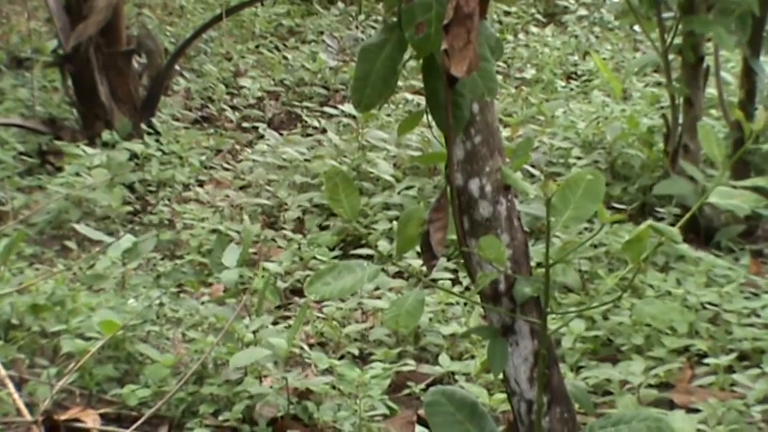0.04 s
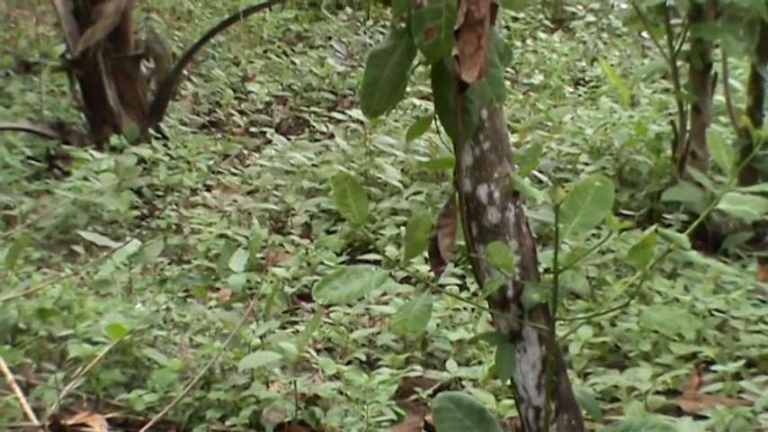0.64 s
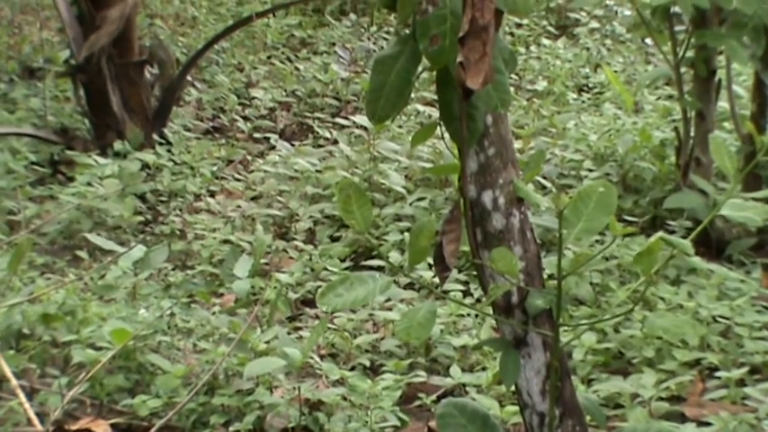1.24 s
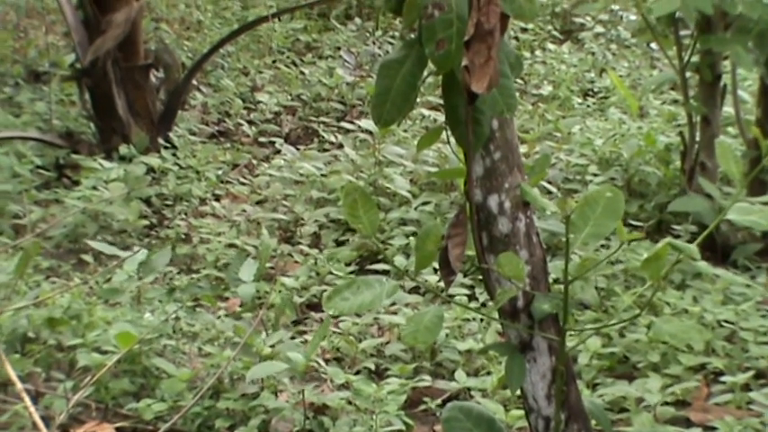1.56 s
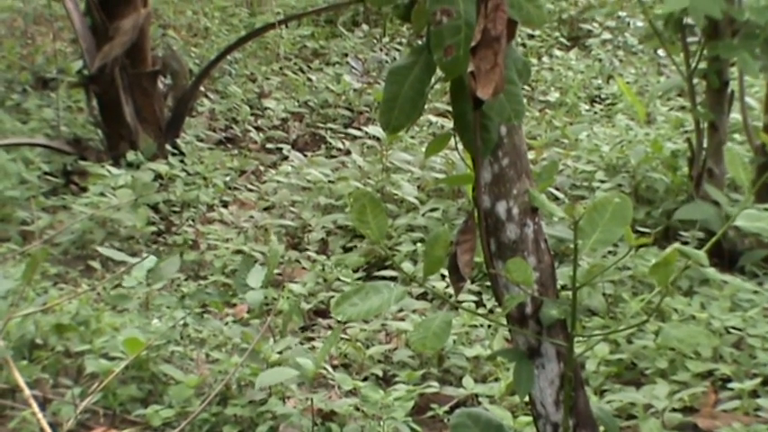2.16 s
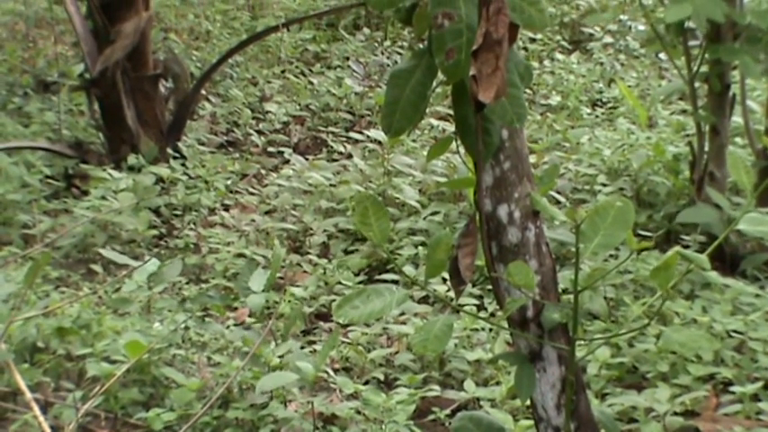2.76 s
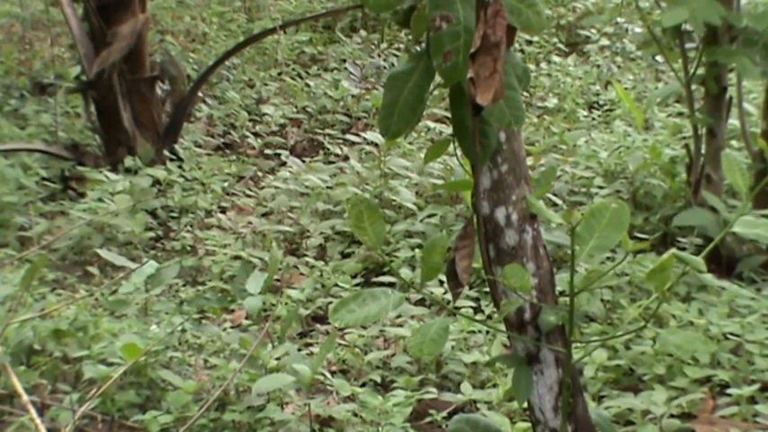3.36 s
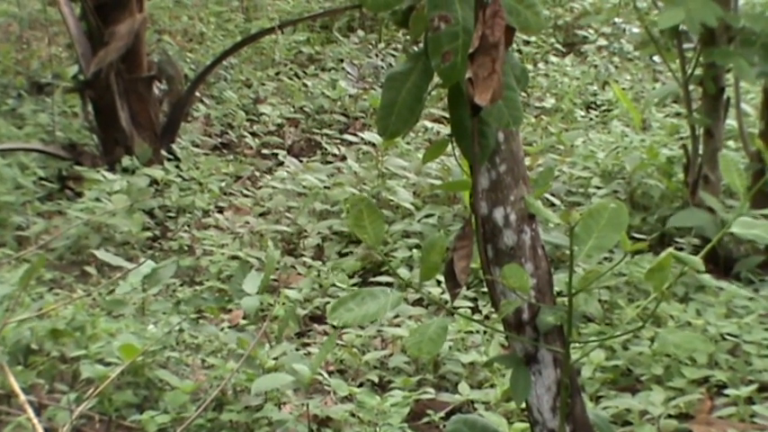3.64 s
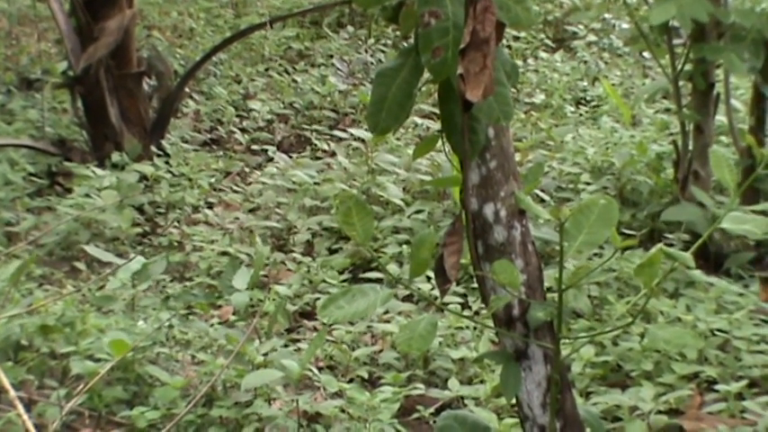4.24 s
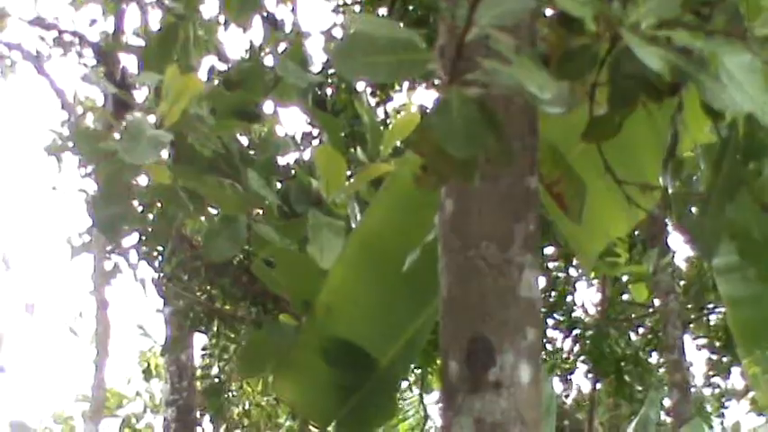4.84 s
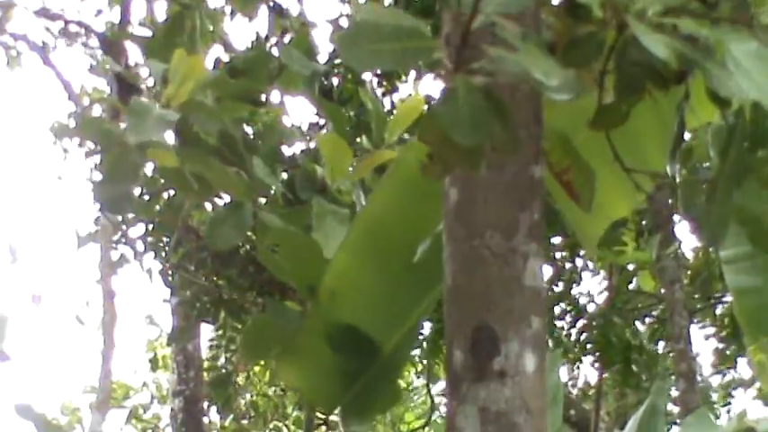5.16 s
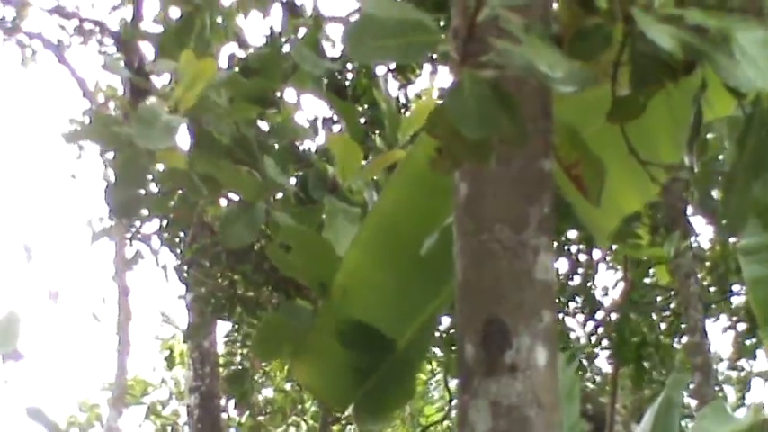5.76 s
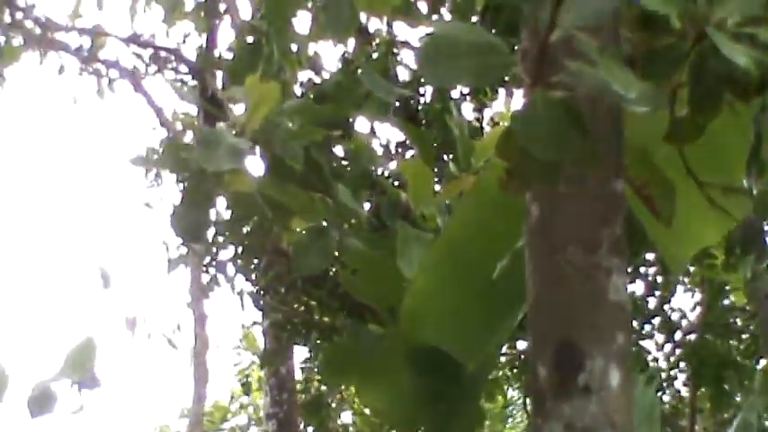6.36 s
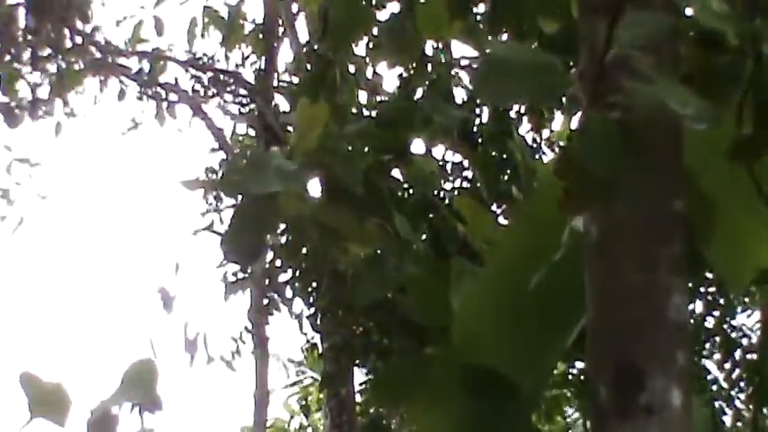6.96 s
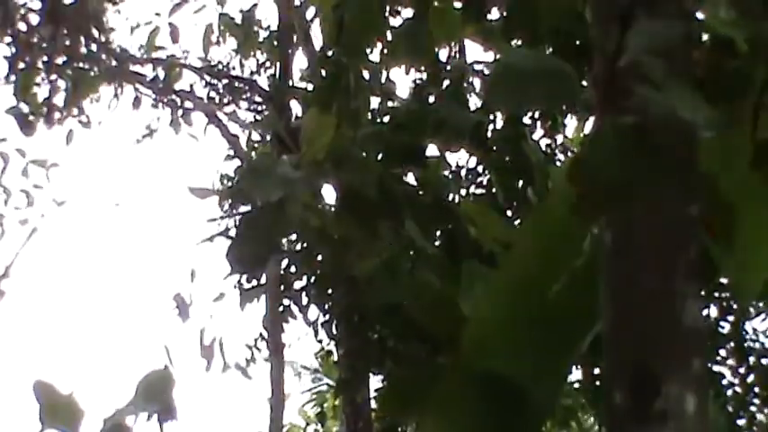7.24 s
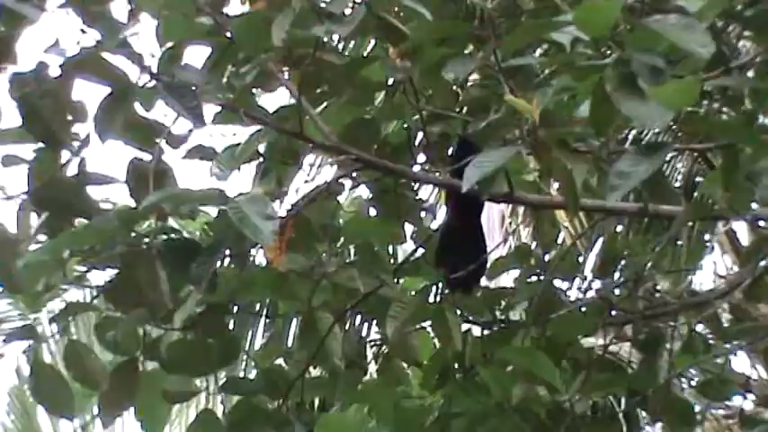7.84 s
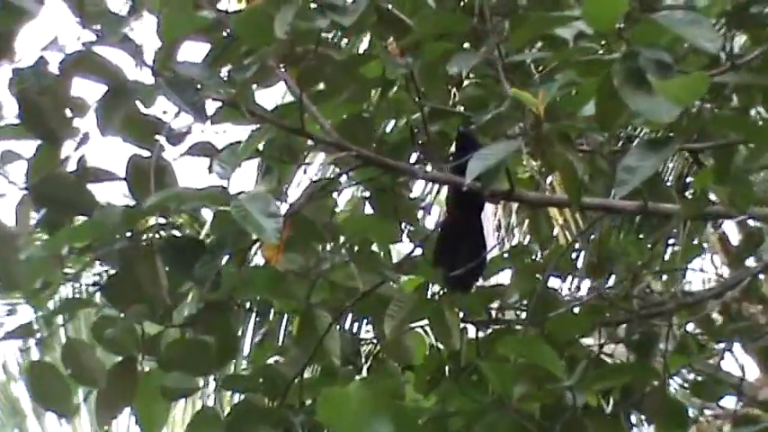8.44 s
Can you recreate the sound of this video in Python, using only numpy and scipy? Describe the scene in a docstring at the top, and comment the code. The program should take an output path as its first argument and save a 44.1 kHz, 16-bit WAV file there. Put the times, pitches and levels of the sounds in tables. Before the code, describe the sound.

Soft forest air, scattered drips and thin, high cricket chirps surround a bird hooting eight low notes, each dipping in pitch. The microphone moves under the trees with a quick fade, where more water patters on the leaves and eight louder hoots follow. Distant animals call faintly now and then. At a last spot the hoots are gone, leaving drips, a chirping cricket and a steady high trill.

```python
"""Wet forest from three microphone spots, joined by short fades; far air murmurs and water drips on leaves.
At the first spot bush crickets chirp high up with their wings, and a coucal hoots eight low notes,
each thrown back by ground and trunks; faint animal calls begin in the distance.
From 4.4 s, under the trees, the drips fall thicker and the coucal hoots a second, louder run of eight.
From 7.9 s, at the last spot, one cricket chirps and another trills without a break."""
import sys
import numpy as np
from scipy import signal
from scipy.io import wavfile
from scipy.ndimage import uniform_filter1d

SR = 44100
rng = np.random.default_rng(int(sys.argv[2]) if len(sys.argv) > 2 else 0)


def store_wav(level_fs):
    """Save 16-bit WAV to argv[1]."""
    pcm = np.round(np.clip(np.atleast_2d(level_fs), -1, 1) * 32767)
    wavfile.write(sys.argv[1], SR, pcm.T.astype(np.int16))


N = 383229
TIME = np.arange(N) / SR
SPOT_CHANGES_S = (4.41, 7.854)

# fades between the microphone spots: t/s, gain
SPOT_FADES = [(0, 1), (4.35, 1), (4.395, 0), (4.425, 0), (4.465, 1), (7.82, 1), (7.851, 0), (7.857, 0),
              (7.885, 1), (8.7, 1)]
# forest air at each spot: f/Hz, relative density/dB, side minus mid/dB
FIRST_AIR = [(25, -74.5, -14), (45, -78.5, -18), (75, -72, -32), (130, -75.5, -24), (250, -76.5, -19),
             (480, -79, -13.5), (910, -83, -2), (1240, -86.5, -1.8), (2000, -85.5, -1), (2980, -87.5, -3.5),
             (4300, -88, -1), (6500, -89.5, -3.5), (9600, -93.5, -5), (15400, -102.0, -25)]
SECOND_AIR = [(25, -81, -18.8), (45, -77.5, -21.1), (75.4, -73, -31), (132, -74, -25), (252, -77, -17),
              (460, -76.5, -17), (900, -83, 2), (1300, -83, -6), (2000, -83.5, -2), (3040, -85.5, -8),
              (4270, -86.5, 0), (6350, -90.5, -0.5), (9550, -91, -3.5), (13900, -100.8, -22)]
THIRD_AIR = [(25, -76, -36.6), (45, -72, -36.9), (75, -74, -31.6), (130, -74.5, -26.9), (249, -74, -20),
             (503, -78.5, -14), (900, -84, -5.2), (1300, -88, -1), (1990, -86, -5), (3000, -90.5, 0),
             (4300, -86, -5), (6500, -89, 3), (9500, -94, -1), (15400, -100.7, -19)]
# animals far from the microphone: t/s, length/s, start f/Hz, end f/Hz, width/Hz, level/dB
DISTANT_CALLS = [(3.1, .6, 890, 850, 190, -53.5), (3.35, .4, 1740, 1660, 170, -56.5),
                 (3.8, .36, 1170, 1020, 60, -58), (5.7, .4, 980, 940, 150, -57),
                 (7.7, 1.3, 2210, 2210, 220, -54)]
# chirping crickets: start t/s, end t/s, period/s, chirp length/s, f/Hz, relative level/dB, wing strokes/Hz
CHIRPERS = [(.03, 4.41, .621, .335, 8135, -52.5, 153.6), (.28, 4.41, .742, .29, 7690, -56, 151.4),
            (7.86, 8.69, .57, .32, 7720, -56.5, 151.4)]
# unbroken trill at the last spot: t/s, f/Hz, relative level/dB
TRILL_CONTOUR = [(7.886, 8590, -48.5), (7.97, 8820, -50), (8.29, 8700, -48.5), (8.462, 8740, -52),
                 (8.508, 9160, -48), (8.576, 8660, -54), (8.68, 8800, -47)]
# drops nearest the microphone:
# t/s, relative leaf level/dB, leaf f/Hz, nominal width/Hz, relative splash level/dB, left minus right/dB
NEAR_DROPS = [(.182, -40.5, 3340, 1440, -63, -8), (.354, -48, 2480, 470, -54, -10),
              (.6205, -45.5, 1500, 975, -46, 0), (1.571, -34, 2030, 400, -55, -8),
              (2.5895, -47, 2850, 830, -47, -6), (3.616, -45, 4260, 900, -52, -4),
              (4.275, -39, 1840, 1300, -44, 6), (4.481, -44.5, 1900, 760, -53, -7),
              (4.763, -44.5, 3640, 610, -51, -6), (4.953, -40.5, 4150, 740, -39.5, -5.5),
              (5.4455, -40.5, 2670, 405, -58, -3), (5.619, -46, 4600, 740, -44, -6),
              (5.651, -37.5, 1400, 280, -43, 0), (5.804, -43, 4170, 1200, -45, -6),
              (6.126, -38.5, 3950, 420, -42.5, -3), (6.257, -46, 4700, 640, -37.5, -6.5),
              (6.387, -42, 2560, 610, -49, -6), (6.491, -42, 2750, 430, -46.5, -5),
              (6.707, -38.5, 3080, 410, -57, -4), (6.991, -40.5, 2020, 390, -49, -5),
              (7.271, -39.5, 2650, 530, -56, -5), (7.3, -41, 4030, 670, -44.5, -4),
              (7.355, -39, 3250, 730, -51, -4), (7.4335, -39, 1420, 290, -64, -4),
              (7.492, -40, 900, 210, -64, 0), (7.674, -38, 1440, 440, -56, 2),
              (7.775, -40.5, 1740, 270, -46, -6), (7.983, -40, 2950, 310, -57, 0),
              (8.1035, -40.5, 1840, 250, -54, -6), (8.135, -39.5, 2170, 560, -48, -4),
              (8.473, -41, 4740, 630, -41.5, -3), (8.54, -32, 2700, 1560, -50, -6),
              (8.582, -37.5, 2900, 696, -54, 3)]
# a typical drop from the higher leaves and its spread: the same columns without t/s
HIGH_DROP, HIGH_DROP_SPREAD = (-45, 2900, 523, -52, -11), (1.1, 450, 65, 3.1, 1.4)
# the coucal's notes: t/s, length/s, f before the fall/Hz, f after the fall/Hz, relative level/dB
FIRST_HOOTS = [(1.364, .110, 360, 348, -23.5), (1.706, .112, 491, 373, -15.3),
               (2.034, .114, 493, 367, -14.7), (2.346, .114, 484, 359, -14.5), (2.635, .111, 475, 352, -15),
               (2.911, .110, 460, 344, -15.7), (3.178, .107, 448, 340, -16.4),
               (3.439, .105, 416, 332, -18.9)]
SECOND_HOOTS = [(5.051, .108, 378, 352, -19), (5.386, .116, 489, 380, -10.7),
                (5.709, .117, 494, 374, -10.6), (6.016, .115, 489, 361, -11.2),
                (6.303, .114, 484, 355, -11.3), (6.576, .112, 476, 349, -12), (6.84, .108, 464, 342, -12.6),
                (7.093, .105, 432, 335, -15)]
# note shape in each run: scoop/Hz, middle of the fall t/s, climb/(Hz/s), attack/s, fade/(dB/s)
FIRST_SHAPE = (55, .0417, 781, .030, 8.6)
SECOND_SHAPE = (81, .0376, 690, .0254, 49)
# paths from bird to microphone, direct and off ground and trunks:
# left delay/s, right delay/s, left gain, right gain (negative = inverted)
FIRST_ECHOES = [(0, .00008, 1, 1.1), (.00081, .00229, .61, -.35), (.0072, .00722, .58, .77),
                (.01204, .01934, .18, .19), (.02175, .03032, .31, .1), (.04164, .03694, .12, .14)]
SECOND_ECHOES = [(.00006, 0, 1, .65), (.00215, .00346, .5, .49), (.00343, .01241, 1.04, .34),
                 (.01013, .01845, .41, .49), (.0185, .0244, .15, .33), (.03971, .03095, .2, .11)]


def from_db(db):
    """Decibels to gain."""
    return 10 ** (np.asarray(db) / 20)


def rms_one(x):
    """Scale to unit power."""
    return x / np.sqrt(np.mean(x ** 2) + 1e-20)


def band(x, low_hz, high_hz, order=2):
    """Butterworth band-pass."""
    edges = [min(low_hz, .4 * SR), min(high_hz, .47 * SR)]
    return signal.sosfilt(signal.butter(order, edges, "band", fs=SR, output="sos"), x + 1e-18)


def resonate(x, hz, width_hz):
    """One resonance with gain 1 at its peak."""
    r = np.exp(-np.pi * width_hz / SR)
    feedback = [1, -2 * r * np.cos(2 * np.pi * hz / SR), r * r]
    return signal.lfilter(np.array([1, 0, -1]) * (1 - r * r) / 2, feedback, x + 1e-18)


def drift(per_s):
    """A slow random wander with spread near 1."""
    return np.interp(TIME * per_s, np.arange(4096), rng.standard_normal(4096))


def narrow_noise(hz, width_hz):
    """A narrow band of noise around a pitch that may move, partly alike in both channels; rms 1."""
    noise = rng.standard_normal((3, N))
    lowpass = signal.butter(2, width_hz / 2, fs=SR, output="sos")
    rasp = signal.sosfilt(lowpass, noise[:2] + 1j * noise[2])
    carrier = np.exp(2j * np.pi * np.cumsum(hz + np.zeros(N)) / SR)
    return rms_one(np.real(rasp * carrier))


def panned(x, pan_db):
    """Place a sound left (positive) or right of the microphone."""
    return x * from_db(np.array([[1], [-1]]) * pan_db / 2)


def add(out, s, sound):
    """Mix a sound in at time s."""
    start = max(0, round(s * SR))
    out[..., start:start + sound.shape[-1]] += sound[..., :max(0, N - start)]


def forest_tail(x, t60, build_s):
    """Leaves and stems all around scatter a tail that builds and dies away, different in each channel."""
    t = TIME[:SR]
    tail = rng.standard_normal((2, SR)) * from_db(-60 * t / t60) * (1 - np.exp(-t / build_s)) ** 2
    return signal.fftconvolve(np.atleast_2d(x), rms_one(tail) / np.sqrt(SR), axes=1)[:, :N]


def air(spectrum, start, end, gain_db, waver_db):
    """Far murmur and leaf hiss at one spot, in half-octave bands that each waver a little."""
    span = (TIME >= start) & (TIME < end)
    edges_hz = 22 * 2 ** np.arange(0, 10, .5)
    white = rng.standard_normal((2, 2, span.sum())) * np.sqrt(SR / 2)
    stir = drift(8.2)[span]
    points_hz, density_db, side_db = np.transpose(spectrum)
    out = np.zeros((2, N))
    for k, (low, high) in enumerate(zip(edges_hz, edges_hz[1:])):
        mid, side = band(white[k % 2], low, high)
        hz = np.sqrt(low * high)
        band_db = np.interp(np.log(hz), np.log(points_hz), density_db)
        wide_db = np.interp(np.log(hz), np.log(points_hz), side_db)
        rustle = 0.3 * stir * hz / (hz + 3000)  # leaves stir the treble as one
        gain = from_db(gain_db + band_db + waver_db * (rustle + 0.84 * drift(14)[span]))
        out[:, span] += gain * (mid + from_db(wide_db) * side * [[1], [-1]])
    return out


def drone(hz, width_hz, level_db):
    """A faint, unsteady low hum from far away."""
    hum = band(rng.standard_normal(N), hz - width_hz / 2, hz + width_hz / 2)
    return from_db(level_db) * rms_one(hum)


def low_stereo_noise(bird, level_db, smooth_s):
    """Faint low recording noise, opposite in the two channels, rises while the hoots sound."""
    calling = uniform_filter1d((np.abs(bird[0]) > .012) * 1., int(smooth_s * SR))
    noise = rms_one(band(rng.standard_normal(N), 40, 350, order=1))
    return from_db(level_db) * calling * noise * [[1], [-1]]


def distant_animals():
    """Distance smears each call into a soft narrow band that swells and fades."""
    out = np.zeros((2, N))
    for s, length, start_hz, end_hz, width_hz, level_db in DISTANT_CALLS:
        progress = np.clip((TIME - s) / length, 0, 1)
        swell = np.sqrt(4 * progress * (1 - progress))
        hz = start_hz + (end_hz - start_hz) * progress
        out += from_db(level_db) * swell * narrow_noise(hz, width_hz)
    return out


def wings(hz, strokes_per_s, width_hz=180, stroke_share=0.26):
    """Each wing stroke drags a file over a scraper and sets the wing ringing briefly; rms 1."""
    cycle = np.cumsum(strokes_per_s * (1 + 0.0042 * drift(3.5))) / SR % 1
    stroke = np.exp(-((cycle - .5) / stroke_share) ** 2)
    ring = narrow_noise(hz, width_hz)
    even_ring = ring / np.sqrt(uniform_filter1d(ring ** 2, SR // 50) + .05)  # strokes of like strength
    return rms_one(stroke * even_ring)


def crickets(chirp_gain_db, trill_gain_db, rise_s, stop_s):
    """High up, crickets repeat chirps that swell and stop short; at the last spot another trills."""
    chirps = np.zeros((2, N))
    for start, end, period_s, length, hz, level_db, strokes_per_s in CHIRPERS:
        t = (TIME - start) % period_s
        active = (TIME > start) & (TIME < end)
        envelope = (1 - np.exp(-t / rise_s)) * np.clip((length - t) / stop_s, 0, 1) * active
        chirps += from_db(level_db + chirp_gain_db) * envelope * wings(hz, strokes_per_s)
    s, hz, level_db = np.transpose(TRILL_CONTOUR)
    trill = narrow_noise(np.interp(TIME, s, hz), width_hz=550)
    trill *= from_db(np.interp(TIME, s, level_db) + trill_gain_db)
    return chirps + trill * (TIME > SPOT_CHANGES_S[1])


def patter(per_s, level_db):
    """Small drops fall at random on leaves of many sizes, on both sides of the microphone."""
    leaves = np.zeros((2, N))
    for hz in np.geomspace(2200, 7500, 10):
        hits = np.flatnonzero(rng.random(N) < per_s / 10 / SR)
        size_db, pan_db = rng.uniform(-1, 1, (2, 400))[:, :len(hits)] * [[7], [8]]
        clicks = np.zeros((2, N))
        clicks[:, hits] = panned(from_db(size_db), pan_db)
        leaves += resonate(clicks, hz, 0.43 * hz) * (hz / 3000) ** -.9
    scattered = leaves + forest_tail(leaves, t60=0.014, build_s=0.00033)
    return from_db(level_db) * rms_one(band(scattered, 890, 8500))


def high_drops(per_s):
    """At the second spot, softer drops fall unevenly from the higher leaves; rows as in NEAR_DROPS."""
    slots = np.arange(*SPOT_CHANGES_S, 1 / per_s)
    chance = rng.uniform(-1, 1, (len(slots), 6))
    times = slots + np.abs(chance[:, 0]) / per_s
    return np.column_stack([times, HIGH_DROP + np.sqrt(3) * chance[:, 1:] * HIGH_DROP_SPREAD])


def onset_rms_one(x):
    """Scale to unit power over the first 16 ms."""
    return x / np.sqrt(np.mean(x[:, :SR // 64] ** 2))


def drops(rows, leaf_gain_db, splash_gain_db, t60, tail_db, tail_t60):
    """A drop sets a damped leaf ringing and throws a short bright splash; the forest adds a tail."""
    out, t = np.zeros((2, N)), TIME[:SR // 8]
    for s, leaf_db, hz, width_hz, splash_db, pan_db in rows:
        noise = rng.standard_normal((3, len(t)))
        burst = (noise[:2] + noise[2]) * from_db(-60 * t / t60)
        ring = resonate(resonate(burst, hz, 1.7 * width_hz), hz, 1.7 * width_hz)
        impact = burst * from_db(-60 * t / 0.021)  # over before the leaf settles
        leaf = from_db(leaf_db + leaf_gain_db) * onset_rms_one(ring)
        splash = from_db(splash_db + splash_gain_db) * onset_rms_one(band(impact, 4350, 9200))
        add(out, s, panned(leaf + splash, pan_db))
    return out + from_db(tail_db) * forest_tail(out, tail_t60, build_s=0.0017)


def hoot(length, high_hz, low_hz, shape, swell_db_per_s, overtone_db):
    """One note, nearly a sine: it scoops up to pitch, falls, then climbs back a little as it closes."""
    scoop_hz, fall_at_s, climb_hz_per_s, attack_s, fade_db_per_s = shape
    scoop_s, fall_s, release_s = .00525, .0134, .0157
    t = TIME[:int(length * SR)]
    scoop = scoop_hz * np.exp(-t / scoop_s)
    fall = (high_hz - low_hz) * (1 + np.tanh((t - fall_at_s) / fall_s)) / 2
    climb = climb_hz_per_s * np.maximum(t - fall_at_s, 0)
    phase = 2 * np.pi * np.cumsum(high_hz - scoop - fall + climb) / SR
    envelope = np.minimum(t / attack_s, 1) * np.minimum((length - t) / release_s, 1)
    envelope *= from_db((swell_db_per_s - fade_db_per_s) * t)
    return envelope * (np.sin(phase) + from_db(overtone_db) * np.sin(2 * phase))


def coucal(hoots, shape, paths, gain_db, tail_db, tail_t60, overtone_db):
    """A run of hoots; at the microphone each glide beats against its echoes off ground and trunks."""
    voice = np.zeros(N)
    for k, (s, length, high_hz, low_hz, level_db) in enumerate(hoots):
        swell_db_per_s = 75 if k == 0 else 0  # the opening hoot starts softly and grows
        note = hoot(length, high_hz, low_hz, shape, swell_db_per_s, overtone_db)
        add(voice, s, from_db(gain_db + level_db) * note)
    at_mic = np.zeros((2, N))
    for left_s, right_s, left_gain, right_gain in paths:
        add(at_mic[0], left_s, left_gain * voice)
        add(at_mic[1], right_s, right_gain * voice)
    return at_mic + from_db(tail_db) * forest_tail(voice, tail_t60, build_s=0.033)


def scene():
    """Bird, drips, air and insects as they reach the microphone at the three spots."""
    second_spot_s, third_spot_s = SPOT_CHANGES_S
    bird = coucal(FIRST_HOOTS, FIRST_SHAPE, FIRST_ECHOES,
                  gain_db=0.37, tail_db=-16.0, tail_t60=0.6, overtone_db=-37.0)
    bird += coucal(SECOND_HOOTS, SECOND_SHAPE, SECOND_ECHOES,
                   gain_db=0.2, tail_db=-20.0, tail_t60=0.9, overtone_db=-42)
    drips = drops([*NEAR_DROPS, *high_drops(per_s=6)],
                  leaf_gain_db=-1, splash_gain_db=-2.5, t60=0.034, tail_db=-1.5, tail_t60=0.52)
    drips += patter(per_s=30, level_db=-58.5) * (TIME < second_spot_s)
    drips += patter(per_s=80, level_db=-53.0) * (TIME > second_spot_s)
    bed = air(FIRST_AIR, 0, second_spot_s, gain_db=-0.43, waver_db=2.5)
    bed += air(SECOND_AIR, second_spot_s, third_spot_s, gain_db=-0.63, waver_db=1.1)
    bed += air(THIRD_AIR, third_spot_s, np.inf, gain_db=0.1, waver_db=2.8)
    bed += drone(hz=74.3, width_hz=14.5, level_db=-59) * (TIME < second_spot_s)
    bed += low_stereo_noise(bird, level_db=-46.0, smooth_s=0.22)
    bed += distant_animals()
    insects = crickets(chirp_gain_db=-1.4, trill_gain_db=2.5, rise_s=0.028, stop_s=0.018)
    return bed + insects + drips + bird


def record(dry):
    """The microphone signal fades out and in between the spots; the top is cut at 15.9 kHz."""
    faded = dry * np.interp(TIME, *np.transpose(SPOT_FADES))
    return signal.sosfilt(signal.ellip(10, .1, 90, 15900, fs=SR, output="sos"), faded)


dry = scene()
out = record(dry)
store_wav(out)
```